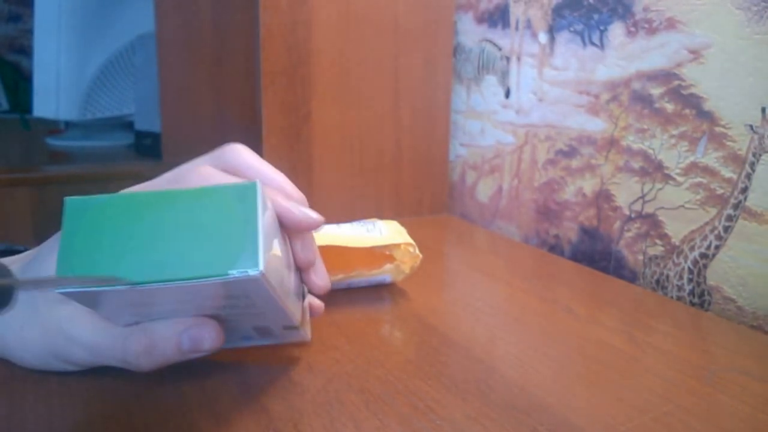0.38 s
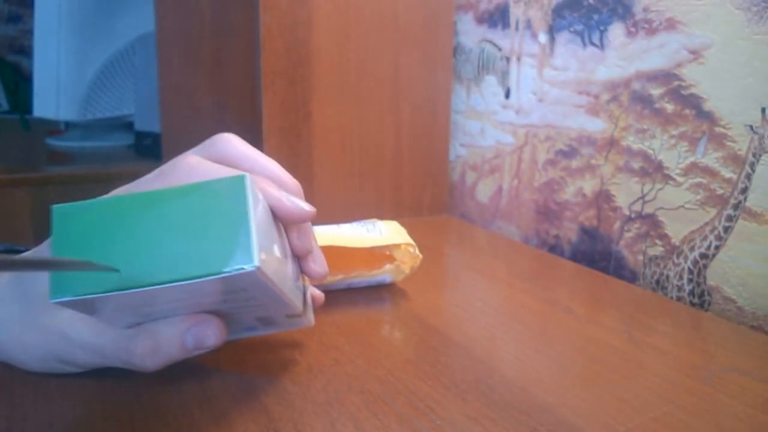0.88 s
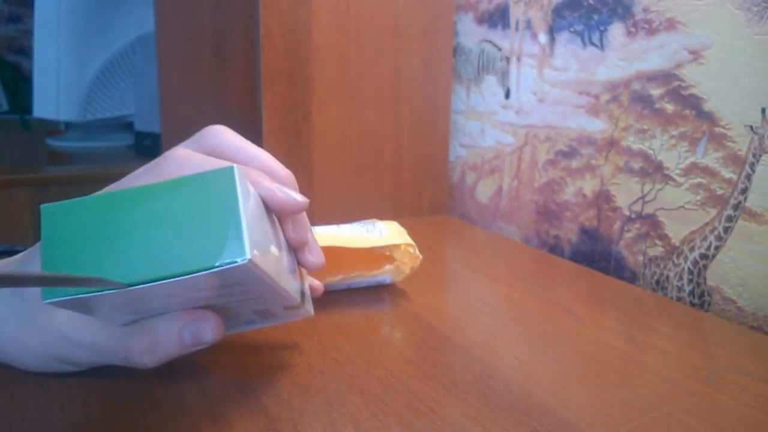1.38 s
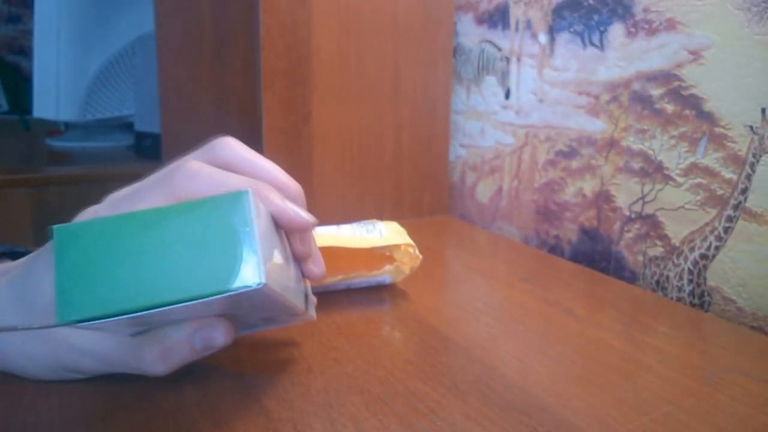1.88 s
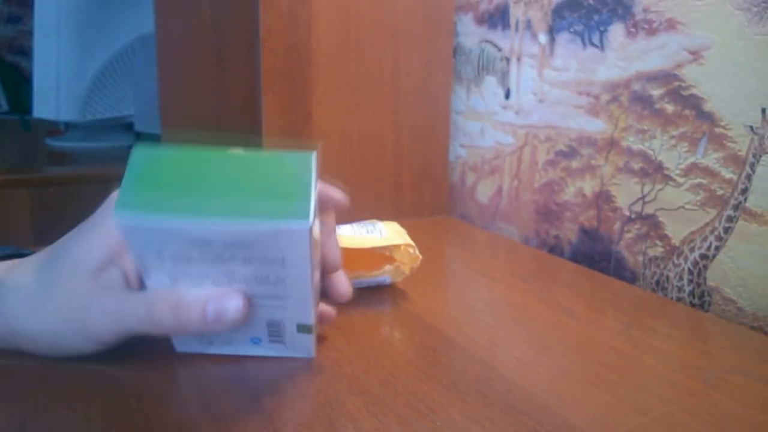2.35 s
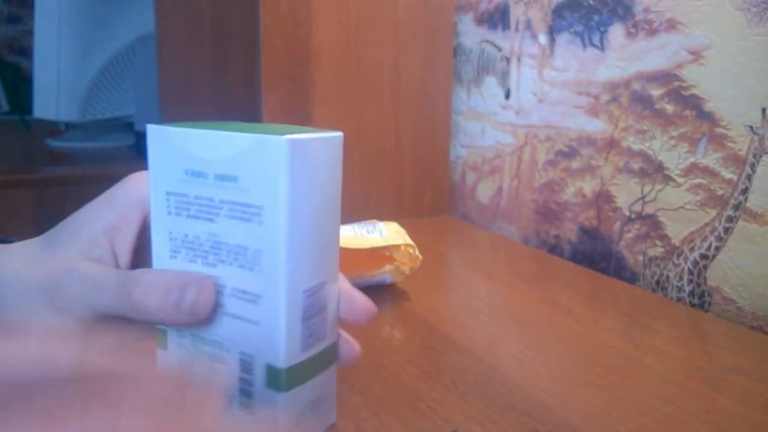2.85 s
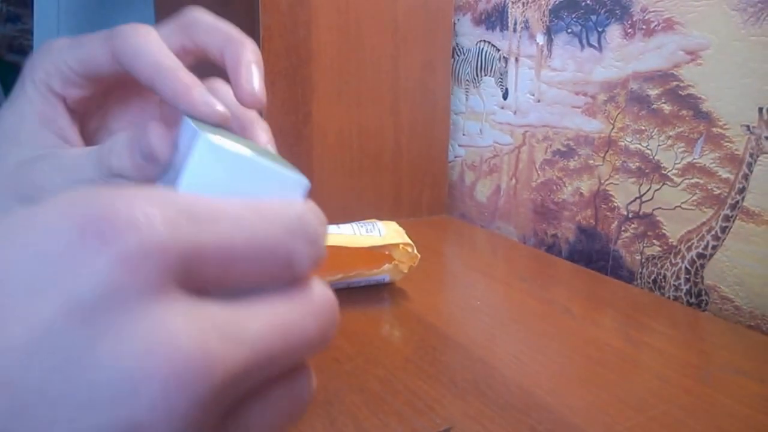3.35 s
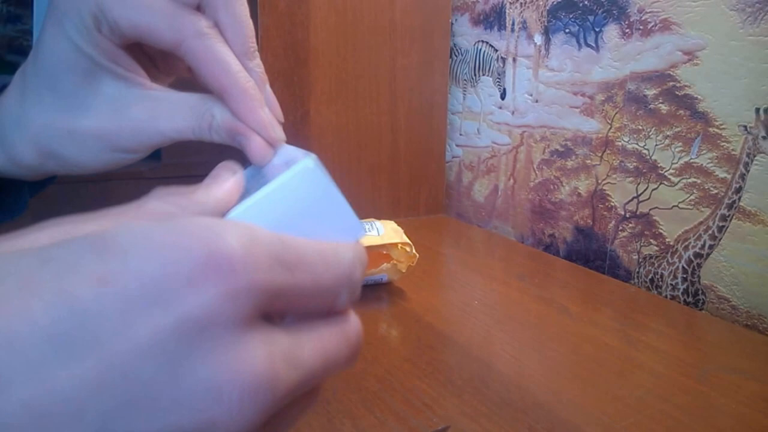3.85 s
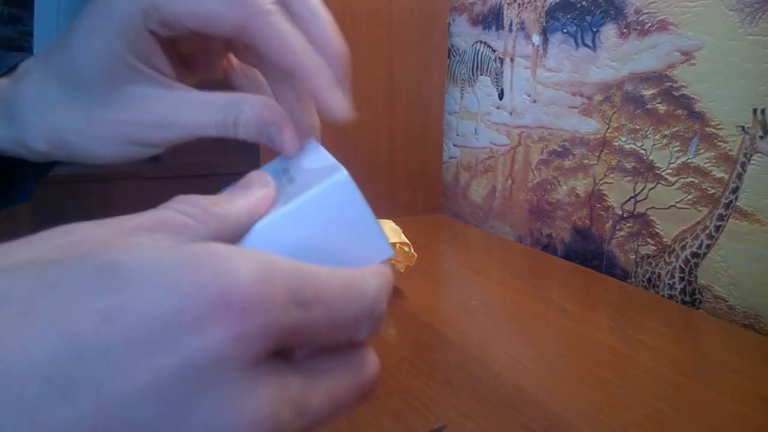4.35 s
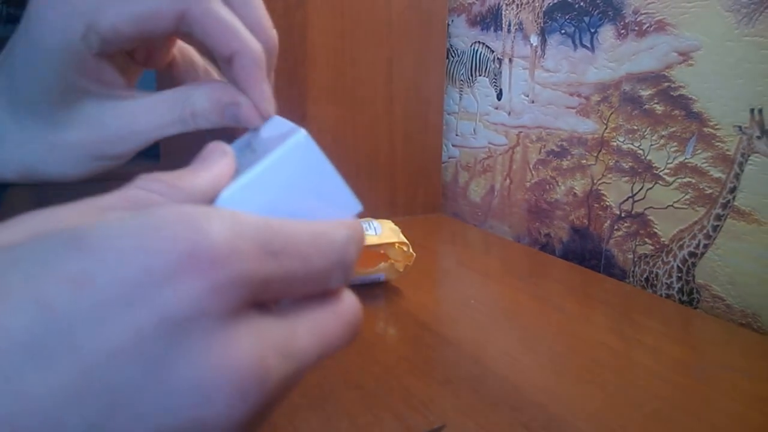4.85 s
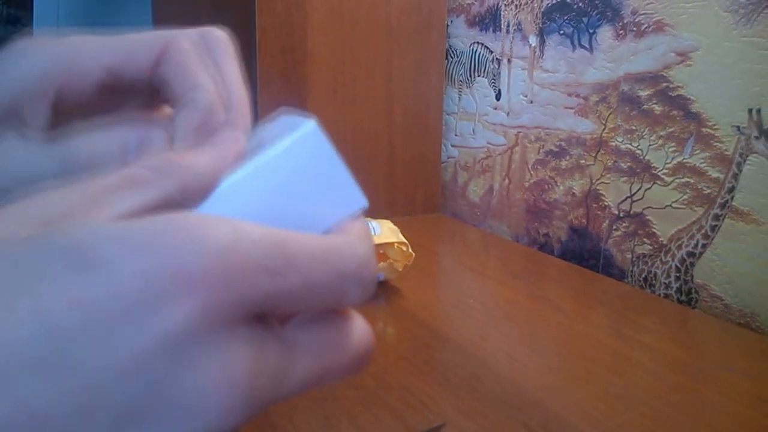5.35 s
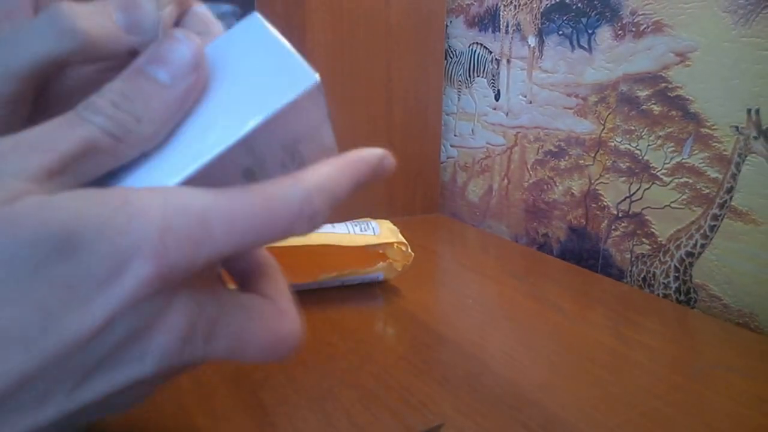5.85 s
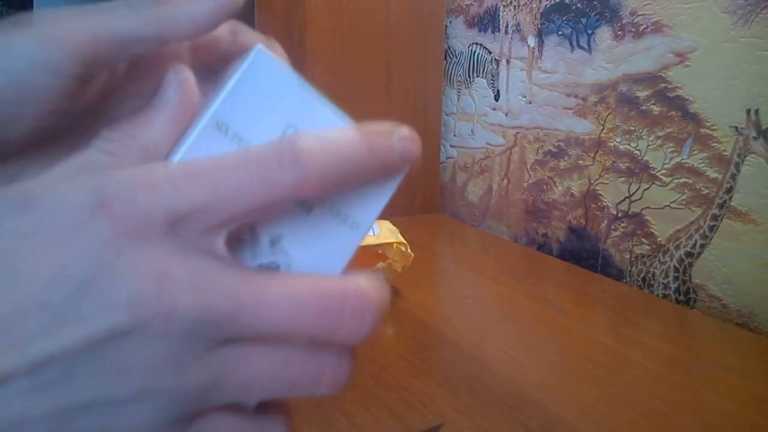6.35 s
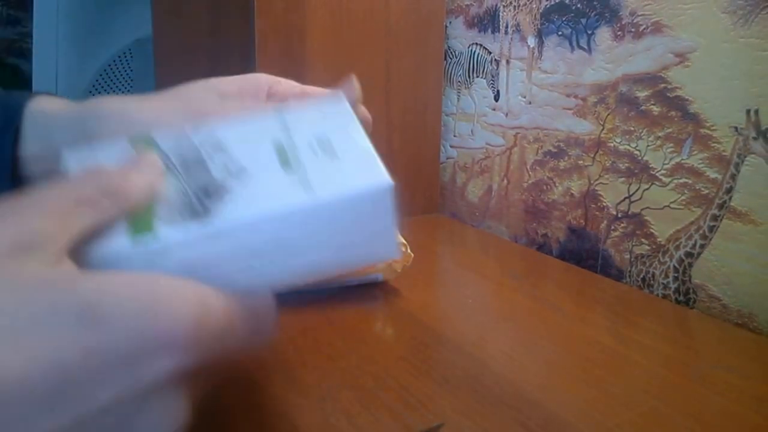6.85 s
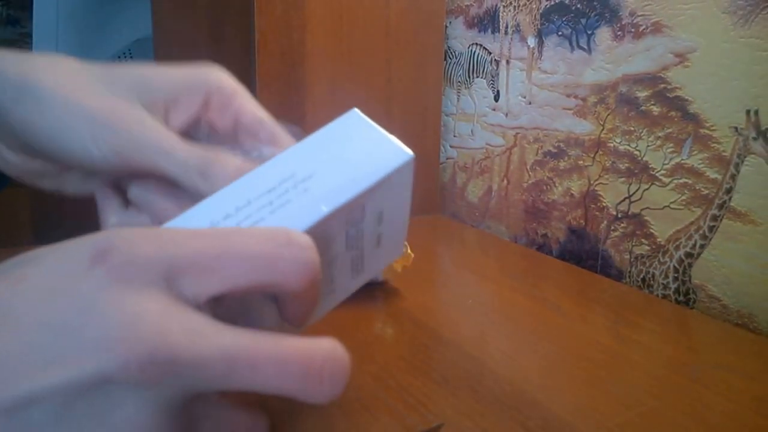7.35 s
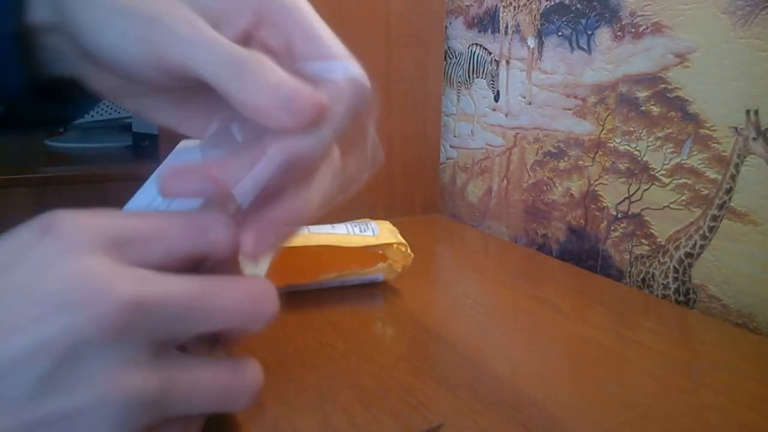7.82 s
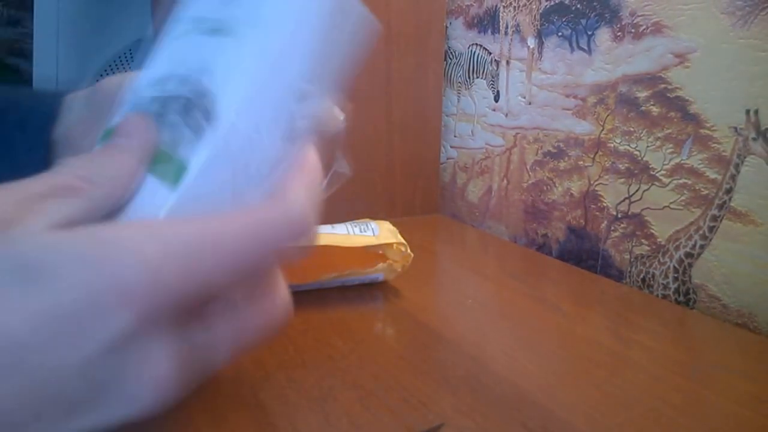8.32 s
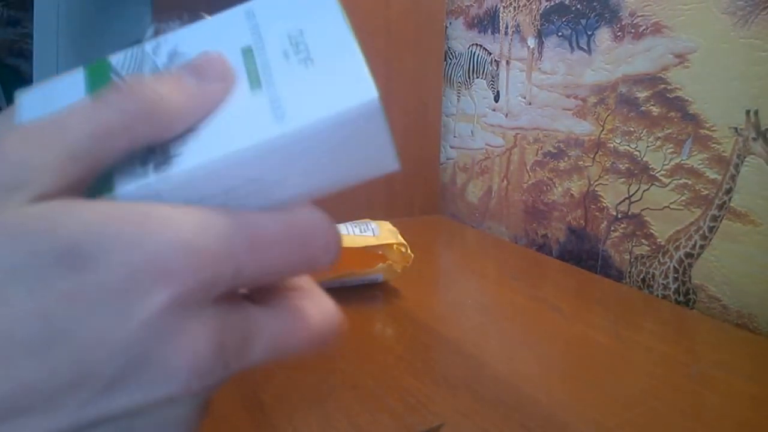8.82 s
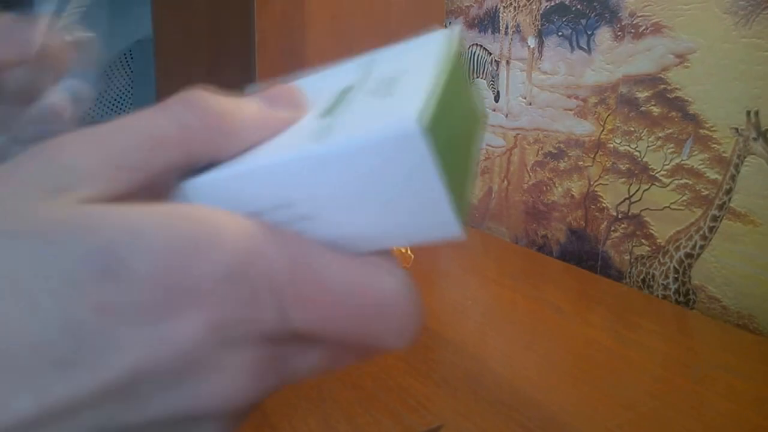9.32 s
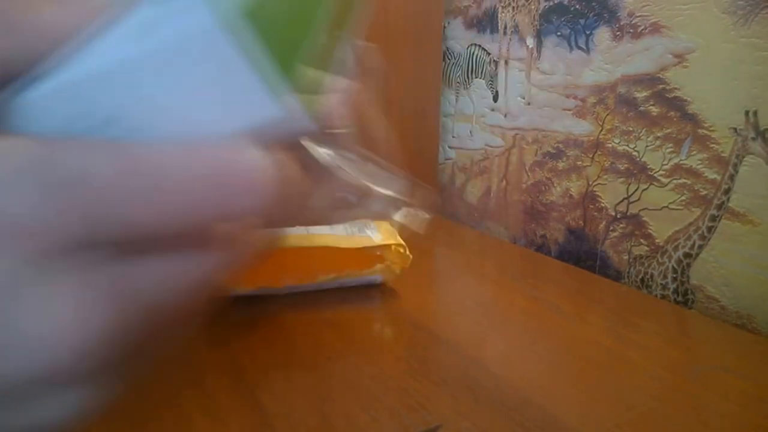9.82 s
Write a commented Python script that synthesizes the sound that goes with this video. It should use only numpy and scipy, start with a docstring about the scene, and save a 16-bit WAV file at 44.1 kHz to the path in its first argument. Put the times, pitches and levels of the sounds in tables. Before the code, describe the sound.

In a quiet room, a boxed item is picked at with a blade, which drops with a clatter; its film wrap is then torn off, crackling.

```python
"""A quiet room hisses and whines faintly, and a table thumps under arms and box, close to one microphone on it.
Hands pick at a small wrapped cardboard box with a blade: knocks and slides ring its panels as noise in resonators.
Near 2.9 s the blade clatters down on the wood: blows of filtered noise, ringing modes and a dying shudder.
From 4.2 s creases of the film wrap snap as short noise cracks; from 5.2 s the film is torn off and crumpled,
as clumped random clicks shaped by each squeeze, with spluttering bursts on top."""
import sys
import numpy as np
from scipy import signal
from scipy.fft import rfft, irfft, next_fast_len
from scipy.io import wavfile

SR = 44100
rng = np.random.default_rng(int(sys.argv[2]) if len(sys.argv) > 2 else 0)


def master_out(mix):
    """Clip the mix to full scale and print it as 16-bit PCM to the path in sys.argv[1]."""
    frames = np.transpose(np.atleast_2d(mix))
    ceiling = np.clip(frames, -1, 1)
    pcm = np.round(ceiling * 32767).astype(np.int16)
    wavfile.write(sys.argv[1], SR, pcm)


N = 438794


def from_db(db):
    """Decibels to gain."""
    return 10 ** (np.asarray(db) / 20)


def rms_one(x):
    """Scale to rms 1."""
    return x / np.sqrt(np.mean(x ** 2) + 1e-20)


def band(x, low_hz, high_hz):
    """Butterworth band-pass."""
    sos = signal.butter(2, [low_hz, min(high_hz, 0.45 * SR)], "band", fs=SR, output="sos")
    return signal.sosfilt(sos, x + 1e-18)


def dull(x, hz):
    """Steep low-pass."""
    return signal.sosfilt(signal.butter(4, min(hz, 0.45 * SR), fs=SR, output="sos"), x + 1e-18)


def at_hz(points, hz):
    """Read a spectrum on a log-frequency axis."""
    point_hz, level_db = np.array(points).T
    return np.interp(np.log(hz), np.log(point_hz), level_db)


def drift(rate_hz):
    """Slow chance at about this rate, spread 1: noise through two equal one-pole low-passes."""
    r = np.exp(-2 * np.pi * rate_hz * 40 / SR)  # one step every 40 samples
    slow = signal.lfilter([1], [1, -2 * r, r * r], rng.standard_normal(N // 40 + 2002))[2000:]
    return np.interp(np.arange(N) / 40, np.arange(len(slow)), rms_one(slow))


def ring(force, hz, t60_s):
    """A mode: a unit click sets a sine of height 1 ringing and dying away."""
    r, w = from_db(-60 / (t60_s * SR)), 2 * np.pi * hz / SR
    return signal.lfilter([0, np.sin(w)], [1, -2 * r * np.cos(w), r * r], force + 1e-18)


def add(track, start_s, sound, peak_db):
    """Lay a sound on the track at its moment and peak height."""
    i = round(start_s * SR)
    track[i:i + len(sound)] += (from_db(peak_db) * sound / np.abs(sound).max())[:N - i]


def crack(noise, t60_s):
    """One clean first break followed by weaker, dying after-shocks."""
    t = np.arange(len(noise)) / SR
    after_shocks = noise * (from_db(-60 * t / t60_s) + from_db(-60 * t / 0.0011))
    return after_shocks + 11.26 * (t == 0)


def grains(per_s, spread_db, clump_db):
    """Random clicks of uneven size in clumps, about per_s a second; the largest is 3.2 spreads over the least."""
    sizes = from_db(spread_db * np.minimum(rng.exponential(1, N), 3.2)) * rng.choice([-1, 1], N)
    chance = per_s * from_db(clump_db * drift(30)) / SR
    return sizes * (rng.random(N) < chance)


# colour of the room's hiss and rumble: pitch_hz, level_db (per Hz, relative)
HISS_COLOUR = [(25, 2), (60, -2.5), (160, -4.5), (300, -15.5), (700, -17), (1500, -22.5), (4500, -24.5),
               (7000, -31.5), (15800, -40)]
# thin electrical whines: pitch_hz, level_db (rms, before they waver)
WHINES = [(2175, -82.5), (4344, -85.5), (5071, -87)]


def background():
    """Steady hiss and rumble in half-octave bands, with thin electrical whines."""
    hiss, white = 0, rng.standard_normal((2, N))
    edges_hz = 22 * 2 ** np.arange(0, 10, 0.5)
    waver_db = 1.1 * drift(4.5)  # the rumble comes and goes
    for k, (low_hz, high_hz) in enumerate(zip(edges_hz, edges_hz[1:])):
        level_db = at_hz(HISS_COLOUR, np.sqrt(low_hz * high_hz)) + waver_db * (k < 7)
        hiss = hiss + from_db(level_db) * band(white[k % 2], low_hz, high_hz)
    t = np.arange(N) / SR
    whine = sum(np.sqrt(2) * from_db(level_db) * np.sin(2 * np.pi * hz * t) for hz, level_db in WHINES)
    return from_db(-65) * rms_one(hiss) + whine * from_db(1.9 * drift(3.3))


# arms and box land on the table by the microphone: start_s, level_db (peak)
THUMPS = [(0.0, -44.5), (2.137, -46.5), (2.36, -33), (2.446, -26.5), (2.556, -35.5), (2.647, -33.5),
          (2.692, -33.5), (2.75, -19.5), (2.876, -20), (3.202, -30), (3.281, -29), (3.494, -27.5),
          (3.669, -47), (5.367, -37.5), (5.797, -39.5), (6.061, -29.5), (6.33, -36), (6.785, -32),
          (6.81, -19), (6.861, -25.5), (7.11, -29), (7.205, -34), (7.344, -36), (7.613, -39), (7.7, -33),
          (7.74, -32), (9.031, -35.5), (9.088, -32), (9.729, -44)]
# booming modes of the table: pitch_hz, level_db (relative), t60_s
TABLE_MODES = [(63, -13, 0.08), (109.5, -8.5, 0.29), (146, 3.5, 0.029), (199.8, -10, 0.21),
               (242, -5.5, 0.011), (298, -4, 0.014), (425, -12.5, 0.27)]


def thumps():
    """Soft flesh presses unevenly for a moment and sets the table top booming."""
    contact_s = 0.058
    out, noise = np.zeros(N), rng.standard_normal((len(THUMPS), 9000))
    t = np.arange(9000) / SR
    for (start_s, peak_db), shake in zip(THUMPS, noise):
        push = band(shake * np.clip(1 - t / contact_s, 0, 1) ** 0.5, 54, 680)
        boom = sum(from_db(level_db) * ring(push, hz, t60_s) for hz, level_db, t60_s in TABLE_MODES)
        add(out, start_s, band(boom, 49, 450), peak_db)
    return out


SET_DOWN_S = 2.4  # the box rings in the air until it meets the table
# panel resonances of the cardboard box: pitch_hz, width_hz, level_db (relative)
BOX_PANELS = [(306, 285, 0), (445, 250, 2), (626, 193, 3.5), (852, 348, 2.5), (1053, 533, 0.5),
              (1674, 1280, -10.5)]


def box(force, sway_db=0, held=False):
    """Broad panel resonances of the cardboard, side by side; each may sway, and a held box rings hollow."""
    hollow = [(806, 160, -4.5)]  # pitch_hz, width_hz, level_db
    out = 0
    for k, (hz, width_hz, level_db) in enumerate(hollow * held + BOX_PANELS):
        r = np.exp(-np.pi * width_hz / SR)
        poles = [1, -2 * r * np.cos(2 * np.pi * hz / SR), r * r]
        gain = from_db(level_db + (sway_db * drift(30) if sway_db else 0))
        panel = signal.lfilter([1 - r * r, 0, r * r - 1], poles, force + 1e-18)
        out = out + (-1) ** k * gain * panel
    return out


# blade tip, nails and box edges knock: start_s, level_db (peak), edge_db (hard edge re level_db)
KNOCKS = [(0.467, -44.5, -48), (0.49, -46.5, -45), (0.548, -56, -19), (0.662, -50, -19), (0.951, -40, -0.5),
          (1.143, -38.5, -13), (1.161, -44, -29), (1.434, -32, -15), (1.445, -39.5, -43),
          (1.873, -30.5, -7), (1.915, -45.5, 1), (2.145, -23, -1.5), (2.448, -27.5, -18.5),
          (2.501, -30.5, -10), (2.645, -29, -57), (2.688, -37, -62), (2.724, -28, -68), (2.742, -25, -68),
          (2.759, -22.5, -6), (2.785, -30, 10), (2.796, -27, 8), (3.114, -35, -37), (3.13, -28.5, -50),
          (3.15, -31, -47), (3.179, -35.5, -27), (3.24, -35, -8.5), (3.291, -33, -44), (3.38, -44.5, -20),
          (3.499, -30, -23.5), (3.525, -33.5, -11), (4.311, -50.5, -31.5), (4.422, -49.5, -20),
          (4.54, -49, -25), (5.071, -50, -27), (6.062, -33.5, -36.5), (8.352, -31.5, -54),
          (9.112, -24.5, -25.5)]


def knocks():
    """Each knock shakes the box panels; a hard edge adds a short bright tick."""
    out, noise = np.zeros(N), rng.standard_normal((len(KNOCKS), 2, 5000))
    for (start_s, peak_db, edge_db), (body, edge) in zip(KNOCKS, noise):
        panels = box(crack(body, 0.065), held=start_s < SET_DOWN_S)
        add(out, start_s, dull(panels, 1798 + 17 * edge_db), peak_db)  # harder is brighter
        add(out, start_s, band(crack(edge, 0.067), 1000, 4900), peak_db + edge_db)
    return out


def room(x):
    """Echoes between walls: ten feedback delays, duller on every round."""
    t60_s, wall_cut_hz = 0.27, 5600
    size = next_fast_len(N + SR)
    turn = -2j * np.pi * np.arange(size // 2 + 1) / size
    step = np.exp(turn)  # a delay of one sample
    damp, echo = np.exp(-2 * np.pi * wall_cut_hz / SR), 0
    wall = (1 - damp) / (1 - damp * step)
    for k, lag in enumerate((rng.uniform(0.0068, 0.031, 10) * SR).astype(int)):
        loop = from_db(-60 * lag / SR / t60_s) * wall * np.exp(lag * turn)
        echo = echo + (-1) ** k * loop / (1 - loop)
    return irfft(rfft(x, size) * echo, size)[:N]


# blade and skin slide on the box: start_s, length_s, level_db (panels at full swell),
# hiss_db (re level_db), pitch_hz (of the hiss)
STROKES = [(0.672, 0.038, -56.5, -16, 3000), (1.242, 0.028, -61, -20, 3000),
           (3.042, 0.037, -59.5, -3, 5860), (0.787, 0.063, -59, -10, 4100), (1.563, 0.14, -47.5, -6, 6100),
           (1.849, 0.04, -41.5, -6, 6000), (2.114, 0.064, -44.5, -12, 4200),
           (2.307, 0.077, -39.5, -11, 4500), (2.461, 0.071, -45, -20, 3940), (2.6, 0.064, -46, -47, 3040),
           (2.741, 0.11, -35, -24.5, 6340), (3.051, 0.32, -60, -33, 5600), (3.718, 0.059, -50.5, -9, 10900),
           (3.837, 0.082, -54, -26.5, 3880), (3.954, 0.044, -50, -14.5, 6900),
           (5.679, 0.19, -51.5, -5, 1720)]


def strokes():
    """A slide swells and lets go: dense slips in the panels, and a hiss pitched by the edge that rubs."""
    swell_share = 0.76  # part of a slide spent swelling
    out, t = np.zeros(N), np.arange(N) / SR
    slips, hiss = grains(3300, spread_db=2.0, clump_db=1.5), rng.standard_normal(N)
    held = rms_one(dull(box(slips, held=True), 1930))
    resting = rms_one(dull(dull(box(slips), 1300), 1300))
    panels = np.where(t < SET_DOWN_S, held, resting)
    for start_s, length_s, panels_db, hiss_db, hiss_hz in STROKES:
        span = slice(round(start_s * SR), round((start_s + length_s) * SR))
        swell = np.interp((t[span] - start_s) / length_s, [0, swell_share, 1], [0, 1, 0]) ** 1.1
        rub = hiss[span]
        edge = band(rub, hiss_hz / 1.07, hiss_hz * 1.1) + 0.6 * band(rub, 2600, 3300)
        edge = dull(edge, 1.15 * hiss_hz) + 0.1 * band(rub, 2500, 11000)
        out[span] += swell * from_db(panels_db) * (panels[span] + from_db(hiss_db) * rms_one(edge))
    return out


# the blade clatters down on the table: start_s, level_db (reference for the hit),
# tick_db (peak re level_db), blow_db (peak re level_db)
BLADE_HITS = [(2.871, -1.5, -34, 0), (2.899, -2, -19.5, -2.5), (2.916, -6.5, -28, -7)]
# table and walls shudder on: pitch_hz, level_db (relative), t60_s
SHUDDER = [(242, -12.5, 0.72), (577, -2, 0.38), (1350, -0.5, 0.44), (2260, 1.5, 0.35), (3790, -20, 0.33),
           (5600, -24.5, 0.17), (9000, -41, .07)]
# table top under the blade: pitch_hz, level_db (relative)
WOOD_MODES = [(312, -12.5), (430, -9.5), (538, -8.5), (953, -2.5), (1071, -7), (1233, -14.5), (1421, -9),
              (1653, -6), (2374, -12.5)]


def drop():
    """Blunt blows on wood; the top rings in its modes, and table and walls shudder on, the treble dying first."""
    wood_t60_s = 0.22  # at 1 kHz; higher modes die sooner
    out, noise = np.zeros(N), rng.standard_normal((len(BLADE_HITS), len(SHUDDER) + 3, 18000))
    t = np.arange(18000) / SR
    for (start_s, peak_db, tick_db, blow_db), (blow, tick, rattle, *tails) in zip(BLADE_HITS, noise):
        add(out, start_s, dull(band(crack(blow, 0.0092), 350, 1800), 3500), peak_db + blow_db)
        add(out, start_s, band(crack(tick, 0.02), 2500, 9400), peak_db + tick_db)
        shudder = 0
        for (hz, level_db, t60_s), tail in zip(SHUDDER, tails):
            colour = rms_one(dull(band(tail, hz / 2.2, hz * 1.39), hz * 1.62))
            shudder = shudder + from_db(level_db - 60 * t / t60_s) * colour
        uneven = from_db(3.0 * drift(76)[:18000]) * np.minimum(t / 0.00637, 1)  # with a short onset
        add(out, start_s, shudder * uneven, peak_db - 10.0)
        force = rattle * from_db(-60 * t / 0.069)
        wood = sum(from_db(level_db) * ring(force, hz, wood_t60_s * np.sqrt(1000 / hz))
                   for hz, level_db in WOOD_MODES)
        add(out, start_s, wood, peak_db - 11.5)
    return out


# film creases snap: start_s, level_db (peak), box_db (box answer re level_db),
# top_db (treble re level_db), pitch_hz (of the crease)
SNAPS = [(4.1816, -29, -14.5, 7, 5200), (5.298, -33.5, -12, -2, 1700), (5.315, -30, -12, 5.5, 4700),
         (5.3648, -31, -0.5, -3, 1720), (5.3805, -25, -4.5, 4, 1700), (5.571, -29.5, -12, -10.5, 5430),
         (5.8052, -25, -16, 4.5, 5900), (5.829, -31.5, -19, -22, 4200), (5.917, -8.5, -14.5, -35, 4800),
         (6.166, -49.5, 15, -33, 1650), (6.223, -4.5, -10.5, -40, 4950), (6.3208, -43.5, 13, -22, 1580),
         (6.334, -4.5, -7.5, -27, 1560), (6.904, -16, -9.5, -20, 4700), (6.915, -17, -21, -21, 4500),
         (7.1194, -9, -4.5, -2, 4800), (7.2715, -15.5, -23, -8, 4900), (7.2955, -13, -44, -21, 3000),
         (7.3886, -10.5, -17, -4.5, 5300), (7.72, -11.5, -9.5, 1, 5200), (7.8322, -17, -11.5, -13, 4500),
         (7.933, -14, -12, 0, 5300), (8.5818, -19, -19, 4, 6300), (8.635, -15, -20, -6.5, 5300),
         (8.984, -5.5, -14.5, -10, 5200), (9.0441, -8, -6.5, 3.5, 4530), (9.368, -19.5, -3.5, 9, 1780)]


def snaps():
    """A crease flips in a few milliseconds at a pitch of its own; the box under it answers."""
    out, noise = np.zeros(N), rng.standard_normal((len(SNAPS), 3, 2000))
    for (start_s, peak_db, box_db, top_db, hz), (mid, low, high) in zip(SNAPS, noise):
        flip = crack(mid, 0.03)
        add(out, start_s, band(flip, hz / 1.245, hz * 1.164) + 0.5 * band(flip, 2280, 5400), peak_db)
        answer = band(crack(low, 0.086), 1100, 2250) + 1.83 * box(crack(low, 0.028))
        add(out, start_s, answer, peak_db + box_db)
        add(out, start_s, band(crack(high, 0.051), 5800, 12500), peak_db + top_db)
    return out


# the hand squeezes or pulls the film: peak_s (moment the crumpling is loudest), level_db,
# swell_s (before the peak) and fade_s (after it), both over 20 dB, fine_db (fine creases re large)
SQUEEZES = [(5.382, -44.5, 0.018, 0.038, 4.5), (5.571, -62.5, 0.14, 0.24, -13),
            (5.93, -46.5, 0.016, 0.13, 7.5), (6.19, -56.5, 0.22, 0.042, -24),
            (6.232, -45, 0.039, 0.19, -3.5), (6.346, -40, 0.018, 0.16, 1.5),
            (6.455, -47.5, 0.016, 0.055, -8), (6.669, -49, 0.13, 0.099, 1.5),
            (6.766, -49, 0.12, 0.012, -27), (6.919, -42, 0.059, 0.027, 3), (7.051, -45.5, 0.16, 0.33, 4),
            (7.118, -35, 0.072, 0.093, 0.5), (7.3, -44, 0.11, 0.52, 4.5), (7.398, -43.5, 0.083, 0.28, -3),
            (7.615, -37.5, 0.15, 0.066, 5), (7.732, -30, 0.022, 0.053, -2.5),
            (7.946, -40, 0.086, 0.034, 1.5), (8.018, -49.5, 0.19, 0.19, 3),
            (8.142, -45.5, 0.023, 0.0048, 6), (8.272, -33.5, 0.016, 0.027, 4),
            (8.344, -50.5, 0.12, 0.13, 8), (8.429, -49, 0.039, 0.098, 3), (8.532, -54, 0.032, 0.17, 15.5),
            (8.592, -35, 0.021, 0.048, 2.5), (8.728, -41, 0.12, 0.21, -0.5), (8.849, -45, 0.14, 0.11, 1.5),
            (8.971, -45.5, 0.18, 0.63, 2.5), (9.057, -33.5, 0.037, 0.12, 1),
            (9.299, -38, 0.069, 0.094, 5.5), (9.377, -31, 0.031, 0.028, 5), (9.502, -46.5, 1, 0.34, 6.5),
            (9.603, -40.5, 0.22, 0.034, -1.5), (9.792, -41.5, 0.075, 0.072, 2),
            (9.84, -38.5, 0.041, 0.07, 0.5), (9.9, -50, 0.18, 0.31, 4.5)]


def squeeze():
    """Levels in dB of large and fine creasing: each squeeze swells to its peak and fades at its own pace."""
    rest_db, in_hand_s = -74, 5.2  # the film ticks faintly once it is in the hand
    fine_steeper = 1.7  # fine creases swell later and fade sooner than large ones
    t = np.arange(0, N, 32) / SR
    peak_s, peak_db, swell_s, fade_s, fine_db = np.transpose(SQUEEZES)[:, :, None]
    lost_db = 20 * np.maximum((peak_s - t) / swell_s, (t - peak_s) / fade_s)
    # powers add
    large = from_db(2 * (peak_db - lost_db)).sum(axis=0) + from_db(2 * rest_db) * (t > in_hand_s)
    fine = from_db(2 * (peak_db + fine_db - fine_steeper * lost_db)).sum(axis=0)
    return [np.interp(np.arange(N) / SR, t, 10 * np.log10(power + 1e-12)) for power in (large, fine)]


# colour of the film: pitch_hz, level_db (per Hz, relative)
FILM_COLOUR = [(1700, 2), (2600, -5), (4800, 2.5), (6500, -10)]


def crumple():
    """Creases run in bursts of a few milliseconds, each with its own colour, over a fine fizz; the box answers."""
    run_rise_s, run_t60_s, fizz_share = 0.0004, 0.013, 0.3  # fizz_share sounds between runs
    film_db, top_db = squeeze()
    runs = np.abs(grains(330, spread_db=2.0, clump_db=1.5))
    fizz = grains(9000, spread_db=1.5, clump_db=2.0)
    runs = runs * np.clip((film_db + 64.0) / 9, 0, 1)  # slack film does not crease
    centre = rng.uniform(-0.11, 13.9, N)  # pitch of a run, as a band number
    fade, rise = from_db(-60 / (run_t60_s * SR)), from_db(-60 / (run_rise_s * SR))
    born = np.flatnonzero(runs)
    pitches_hz, bands = np.geomspace(500, 14000, 13), []
    for k, hz in enumerate(pitches_hz):
        near = np.zeros(N)
        near[born] = runs[born] * from_db(-0.8 * (k - centre[born]) ** 2)  # loudest around its own pitch
        swell = signal.lfilter([1 - rise], np.convolve([1, -fade], [1, -rise]), near + 1e-18)
        creases = (swell + fizz_share) * np.roll(fizz, 997 * k)
        bands.append(rms_one(band(creases, hz / 1.242, hz * 1.16)))
    panels = box(sum(bands[:5]) + 11.4 * fizz / fizz.std(), sway_db=2.5)  # the grip damps the box unevenly
    panels = dull(signal.lfilter([1, -0.93], [1], panels), 2600)  # light creases stir the small panels most
    film = sum(from_db(at_hz(FILM_COLOUR, hz)) * np.sqrt(hz) * one
               for hz, one in zip(pitches_hz[5:10], bands[5:10]))
    tilt_db = 0.063 * np.clip(top_db - film_db, -30, 0) - 3.5  # the weaker the fine creases, the duller
    top = sum(from_db(k * tilt_db) * one for k, one in enumerate(bands[10:]))
    panels_db = -43.0 + 0.92 * (film_db + 43.0)  # the box follows the film less steeply
    low_and_mid = from_db(panels_db) * rms_one(panels) + from_db(film_db) * rms_one(film)
    return low_and_mid + from_db(top_db) * rms_one(top)


# a crease tears along the film in a short burst: start_s, level_db (reference for the burst)
CRINKLES = [(5.261, -30.5), (5.491, -37.5), (5.65, -43), (5.763, -39), (5.7883, -35), (5.858, -45),
            (5.961, -22), (6.0178, -24.5), (6.1829, -38), (6.1964, -24), (6.454, -29), (6.5222, -33.5),
            (6.596, -25), (6.618, -28), (6.6384, -22), (6.6559, -21), (6.6833, -21), (6.7537, -33),
            (6.838, -29.5), (6.8554, -22), (6.8784, -44), (7.0215, -34), (7.036, -22), (7.046, -12.5),
            (7.0709, -13.5), (7.0914, -11), (7.1118, -17), (7.1857, -17.5), (7.2425, -16.5), (7.28, -16),
            (7.4351, -35), (7.4605, -20), (7.5254, -33), (7.5633, -34), (7.6037, -17), (7.6142, -25),
            (7.699, -23), (7.7384, -17), (7.7599, -12.5), (7.7853, -15.5), (7.8576, -13.5), (7.8821, -13),
            (7.9854, -14.5), (8.0522, -25), (8.0811, -23.5), (8.2527, -22), (8.2677, -15), (8.3241, -26),
            (8.339, -23), (8.3765, -31), (8.4244, -17), (8.5072, -27), (8.5231, -19.5), (8.5371, -22),
            (8.566, -17.5), (8.7137, -41), (8.7217, -18), (8.7761, -28), (8.813, -18), (8.8703, -34),
            (8.9596, -28), (9.0175, -18), (9.0769, -16), (9.1128, -12), (9.1412, -15.5), (9.2081, -23.5),
            (9.249, -14.5), (9.2769, -19), (9.3233, -16), (9.3433, -27), (9.3557, -16), (9.4111, -23),
            (9.4415, -16), (9.452, -12.5), (9.5064, -33), (9.5648, -26), (9.5857, -35), (9.5977, -12),
            (9.6835, -49), (9.8307, -17)]


def crinkles():
    """Each burst is a splutter of tiny flips at a chance pitch; strong ones are brighter, and the box answers."""
    t60_s, box_db, brighter_db_per_db, brighter_hz_per_db = 0.045, -14, 0.93, 222
    out, noise = np.zeros(N), rng.standard_normal((len(CRINKLES), 3, 2000))
    chance = rng.uniform(-0.58, 1, (len(CRINKLES), 3))
    decay = from_db(-60 * np.arange(2000) / SR / t60_s)
    for (start_s, peak_db), (mid, low, high), (pitch, bright, heavy) in zip(CRINKLES, noise, chance):
        hz = 4600 * 2 ** (0.4 * pitch)
        flips = crack(mid * np.abs(low), t60_s)  # a product of two noises is spiky
        add(out, start_s, band(flips, hz / 1.14, hz * 1.27), peak_db - 6.5)
        treble = band(crack(high * np.abs(low), t60_s), 7700, 11900)
        treble = dull(treble, 18000 + brighter_hz_per_db * peak_db)
        treble_db = peak_db - 6.5 + brighter_db_per_db * (peak_db + 14) + 4 * bright
        add(out, start_s, treble, treble_db)
        answer = band(low * np.abs(high) * decay, 374, 3600)
        add(out, start_s, answer, peak_db + box_db + 4 * heavy)
    return out


def scene():
    """Everything happens close to one microphone on the table."""
    film = snaps() + crinkles() + crumple()
    film = film - 0.29 * band(film, 2295, 2880)  # the echo off the table top cancels part of a band
    hands = knocks() + strokes() + film
    echoes = from_db(-22) * room(hands)
    return (hands + echoes + drop() + thumps() + background())[None]


def top_cut(x):
    """Nothing passes above the cut-off."""
    return signal.sosfilt(signal.butter(12, 16830, fs=SR, output="sos"), x)


def record(dry):
    """The top is cut steeply, 60 dB down from 16.5 kHz."""
    mix = signal.sosfilt(signal.cheby2(12, 60, 16500, fs=SR, output="sos"), dry)
    return top_cut(mix)


dry = scene()
out = record(dry)
master_out(out)
```